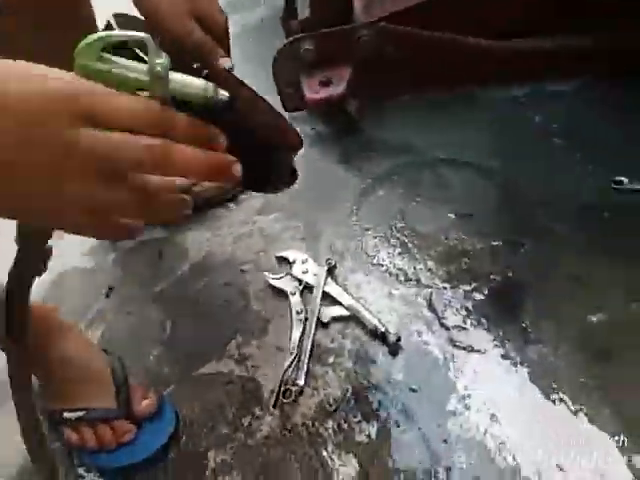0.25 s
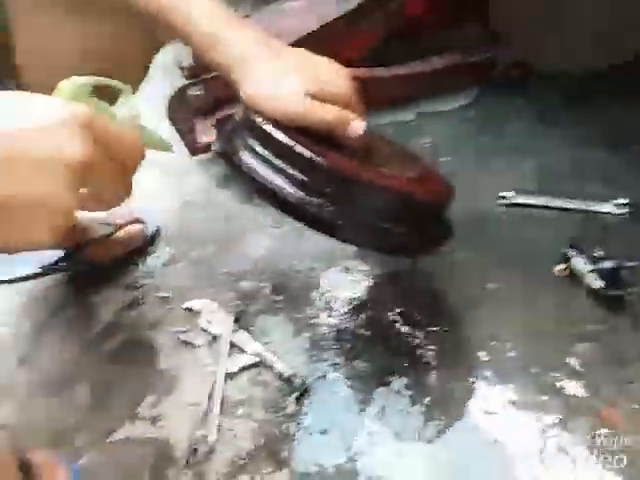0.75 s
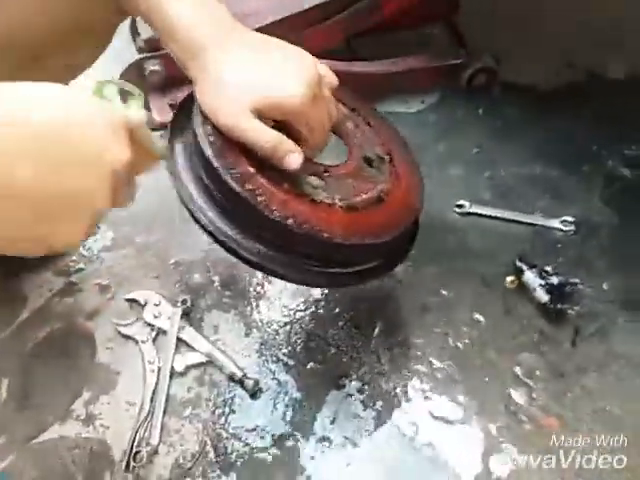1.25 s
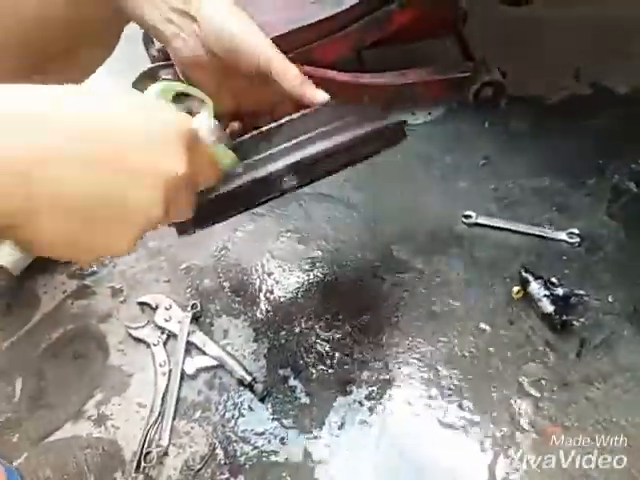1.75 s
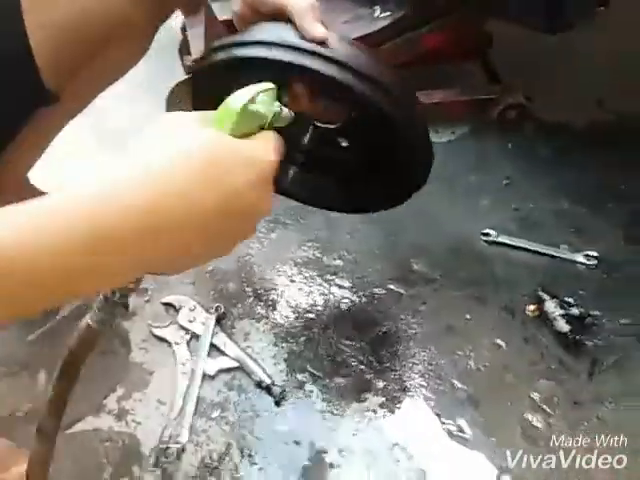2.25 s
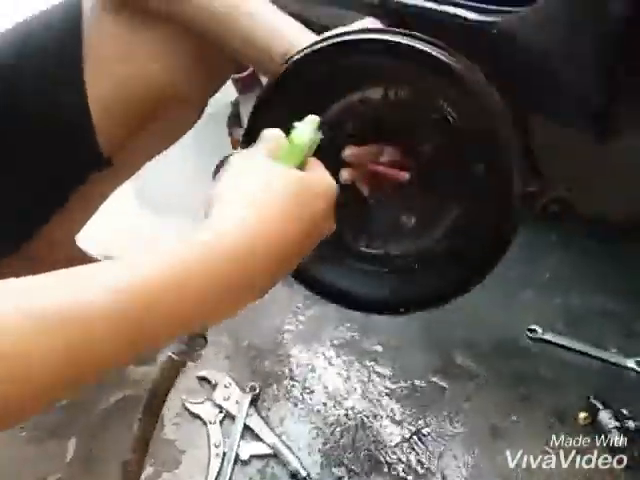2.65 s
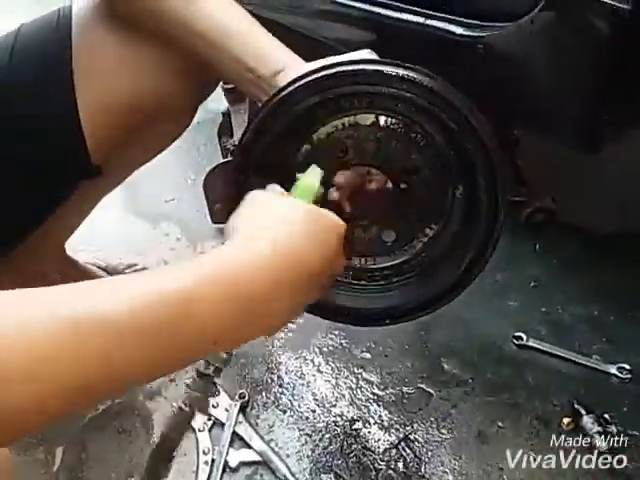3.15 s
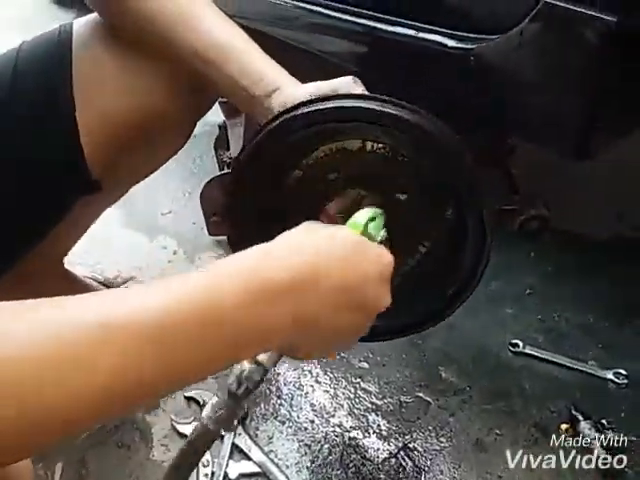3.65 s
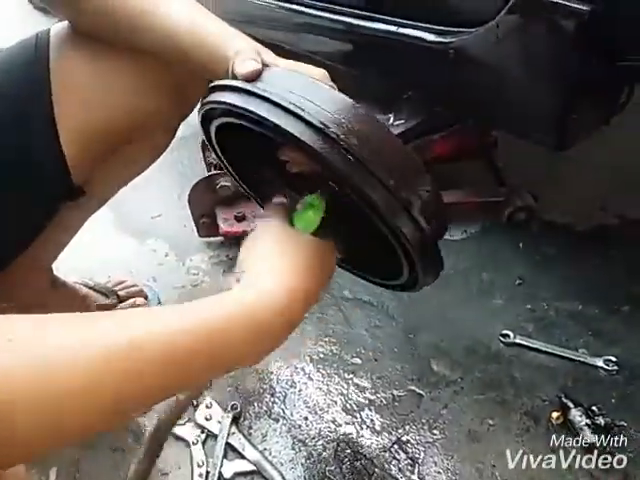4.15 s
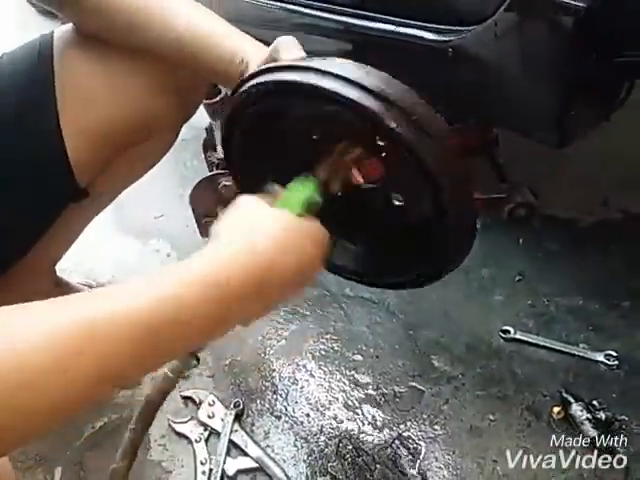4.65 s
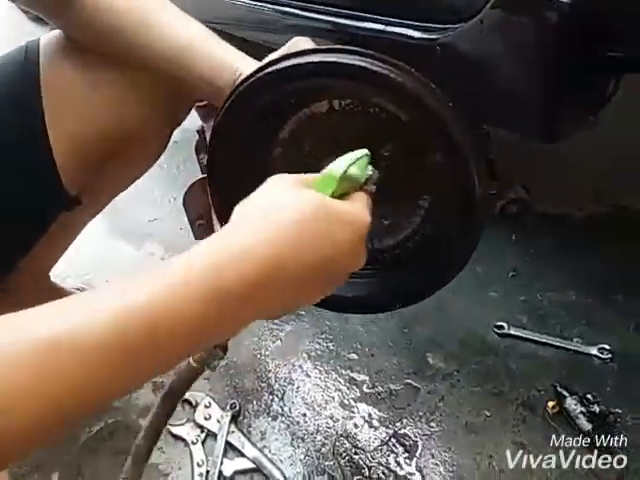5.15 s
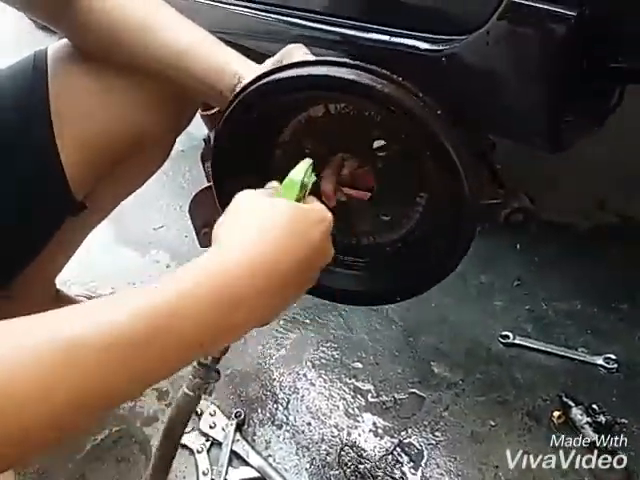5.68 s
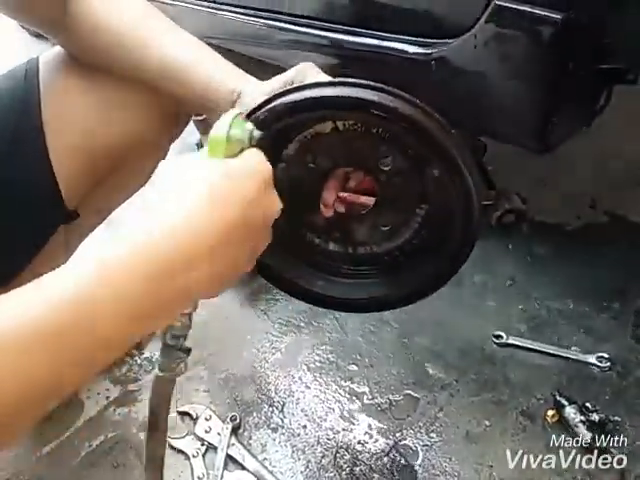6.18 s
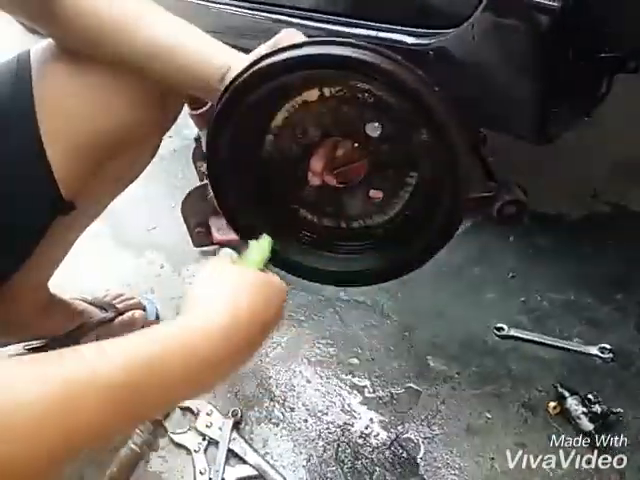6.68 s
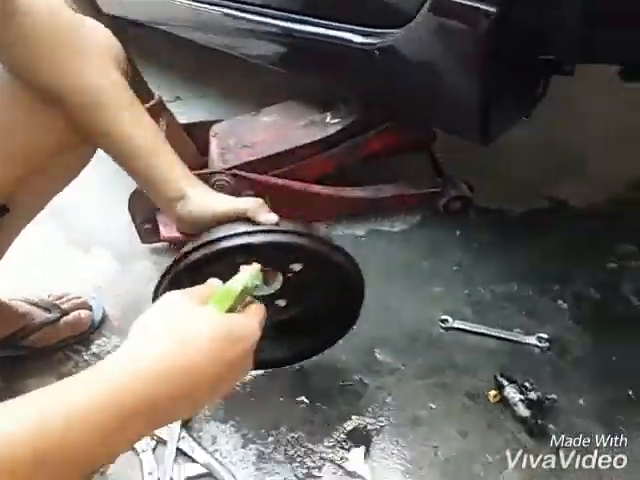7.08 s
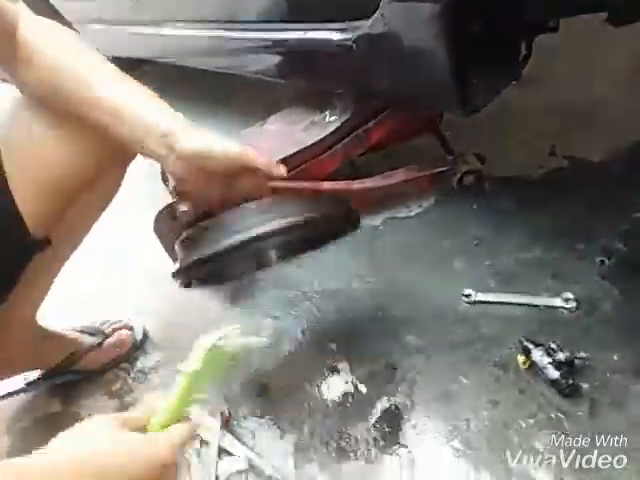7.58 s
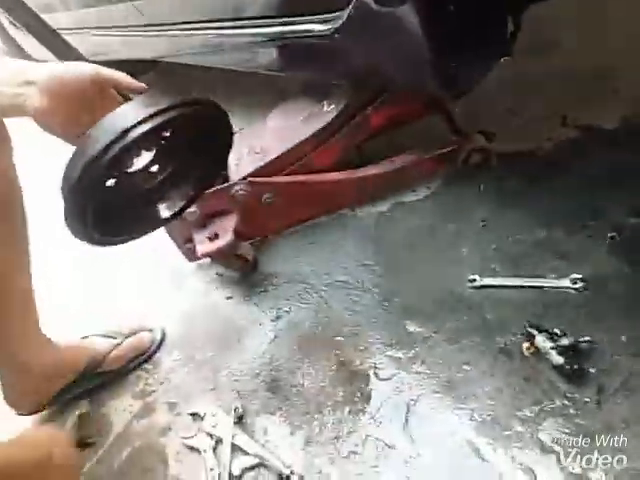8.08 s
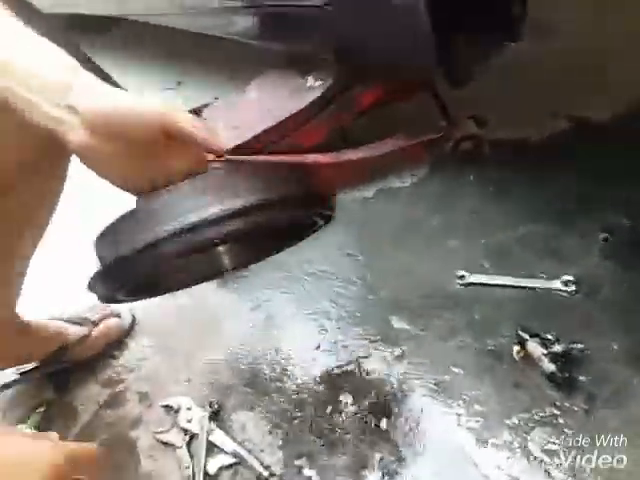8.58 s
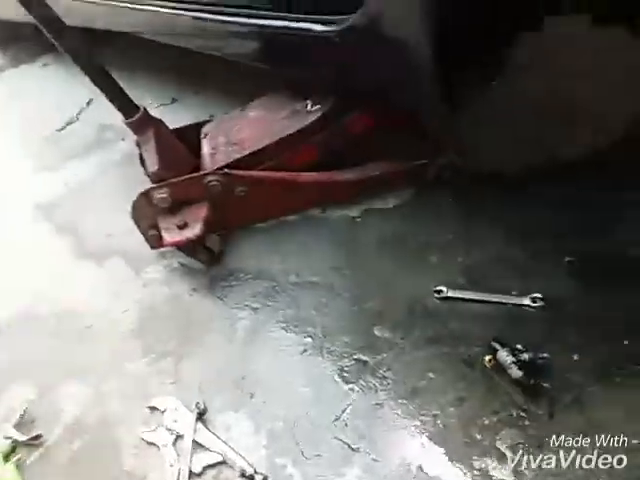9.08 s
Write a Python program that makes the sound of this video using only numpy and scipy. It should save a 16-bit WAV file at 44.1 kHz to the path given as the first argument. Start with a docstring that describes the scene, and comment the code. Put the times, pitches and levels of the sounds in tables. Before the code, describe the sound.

A workshop with a concrete floor, heard close and jumpy, as if time were skipping ahead. Over a faint low rumble, a brake drum is handled with soft gritty scrapes, ticks and small knocks. A bird outside cheeps faintly at about 1.4 and 2.5 seconds. Around 1.6 seconds a wrench clatters with a bright, chopped ring; a sharp tool clang follows near 3 seconds and a softer ring from the drum around 3.7. At about 4.9 seconds a compressed-air gun opens with a brief, very high whistle and a loud hiss that continues unbroken to the end, just past 9 seconds. The jet surges and changes colour in small steps as it sweeps the metal, sometimes bright and splashy, sometimes a hollow roar, especially between 7 and 8 seconds. Deflected air pops on the microphone near 7 seconds and again from about 8.5.

```python
"""A workshop with a wet concrete floor: a brake drum is handled among dropped tools, then blown dry
with a compressed-air gun, close enough for the air to buffet the microphone. Outside, a bird cheeps
over a low rumble. The scene runs in time lapse: time skips ahead every few hundredths of a second,
so levels jump in steps and rings are cut short. One microphone feeds both channels."""
import sys
import numpy as np
from scipy import signal
from scipy.fft import rfft, irfft, next_fast_len
from scipy.io import wavfile
from scipy.ndimage import uniform_filter1d

SR = 44100
rng = np.random.default_rng(int(sys.argv[2]) if len(sys.argv) > 2 else 0)


def put_to_file(sound):
    """Save the sound as 16-bit audio at rate SR, in the file named by the first command-line argument."""
    columns = np.atleast_2d(sound).T  # one column per channel
    safe = np.clip(columns, -1, 1)
    whole_steps = np.round(safe * 32767)
    wavfile.write(sys.argv[1], SR, whole_steps.astype(np.int16))


N = 411453
NOW = np.arange(N) / SR
SLICE_S, JOIN_S = 0.044, 0.0053   # a slice of the time lapse; the crossfade at a jump
VALVE_S = 4.856                   # the air gun opens


def amp(db):
    """dB to gain."""
    return 10 ** (np.asarray(db) / 20)


def rms_one(x):
    """Scale to rms 1."""
    return x / np.sqrt(np.mean(x ** 2) + 1e-20)


def add(out, s, sound):
    """Mix a sound in at a time."""
    at = round(s * SR)
    out[at:at + len(sound)] += sound[:N - at]


def along(rows):
    """The columns of a curve, joined by straight lines in time."""
    s, *columns = np.transpose(rows)
    return np.array([np.interp(NOW, s, c) for c in columns])


def held(background, events):
    """Each event holds its own values in place of the background; also the times of the jumps."""
    out = background.copy()
    for s, length, *values in events:
        out[:, round(s * SR):round((s + length) * SR)] = np.array(values)[:, None]
    s, length = np.transpose(events)[:2]
    jumps = np.unique(np.round(np.r_[s, s + length], 3))
    distinct = np.diff(jumps, append=99) > 0.006
    return out, jumps[distinct & (jumps < N / SR)]


def joined(db):
    """Gains with their jumps softened by short crossfades."""
    return uniform_filter1d(amp(db), size=round(JOIN_S * SR), axis=-1)


def per_slice(low, high):
    """A new random value for every slice of the time lapse."""
    return rng.uniform(low, high, 400)[(NOW / SLICE_S).astype(int)]


def grainy(spread_db):
    """White noise whose samples differ widely in size: grit, droplets, eddies."""
    return rng.standard_normal(N) * amp(spread_db * np.minimum(rng.exponential(1, N), 5))


def lumps(rate_hz, depth_db):
    """Random gain that wanders at about the given rate."""
    hop = 16
    lowpass = signal.butter(2, rate_hz, fs=SR / hop, output="sos")
    slow = rms_one(signal.sosfilt(lowpass, rng.standard_normal(N // hop + 2)))
    return amp(depth_db * np.interp(np.arange(N) / hop, np.arange(len(slow)), slow))


def coloured(x, spectrum):
    """Filter a signal by the spectrum; rms 1."""
    size = next_fast_len(N)
    bins_hz = np.maximum(np.fft.rfftfreq(size, 1 / SR), 1)
    hz, db = np.transpose(spectrum)
    gain = amp(np.interp(np.log(bins_hz), np.log(hz), db))
    return rms_one(irfft(rfft(x, size) * gain, size)[:N])


def resonance(x, hz, width):
    """Two-pole peak of gain 1."""
    r = np.exp(-np.pi * width / SR)
    poles = [1, -2 * r * np.cos(2 * np.pi * hz / SR), r * r]
    return signal.lfilter(np.array([1, 0, -1]) * (1 - r * r) / 2, poles, x)


def steep_resonance(x, hz, width):
    """The same peak twice over."""
    return resonance(resonance(x, hz, width), hz, width)


def focused(x, starts, focus_hz, breadth):
    """A broad peak that jumps to a new pitch at every start; each stretch at rms 1."""
    out, edges = np.zeros(N), list(np.round(starts * SR).astype(int)) + [N]
    for a, b, hz in zip(edges, edges[1:], focus_hz):
        lead = min(a, 200)   # samples for the filter to settle
        out[a:b] = rms_one(resonance(x[a - lead:b], hz, breadth * hz)[lead:])
    return out


# Low background rumble at the microphone; it ducks after the loud clang, then recovers:
# (time [s], level [dB])
RUMBLE_LEVEL = [(0.0, -53), (1.3, -55.5), (2.96, -56), (3.06, -73), (3.3, -61), (3.43, -56.5), (4.8, -55.5),
                (6.5, -58), (8.2, -56), (8.5, -53), (9.33, -49)]
# Its colour: (frequency [Hz], level [dB])
RUMBLE_SPECTRUM = [(20, -14.5), (45, -2), (75, -2), (130, -3.5), (200, -11.5), (400, -53)]
def rumble():
    """Dull noise from far off, following a level curve."""
    return amp(along(RUMBLE_LEVEL)[0]) * coloured(rng.standard_normal(N), RUMBLE_SPECTRUM)


# Bird out in the yard: (time [s], length [s], first pitch [Hz], goal pitch [Hz], rise [s], level [dB])
BIRD_CHEEPS = [(1.406, 0.084, 1513, 1843, 0.02, -48.5), (2.454, 0.094, 1400, 1955, 0.038, -53.5),
               (4.794, 0.11, 1470, 1800, .03, -61)]
# Its throat favours the third harmonic: (multiple of the pitch, level [dB])
BIRD_HARMONICS = [(2, -8), (3, 0), (4, -14), (5, -12), (6, -22), (7, -17)]
def bird(echo_decay_s=0.03, echo_db=3):
    """Rising, husky cheeps: overtones of a wavering pitch that levels off, smeared by yard echoes."""
    out = np.zeros(N)
    for s, length, first_hz, goal_hz, rise, db in BIRD_CHEEPS:
        progress = np.arange(round(length * SR)) / (length * SR)
        waver, flutter = rms_one(uniform_filter1d(rng.standard_normal((2, len(progress))), size=30))
        pitch = goal_hz - (goal_hz - first_hz) * np.exp(-progress * length / rise)
        phase = np.cumsum(pitch * (1 + 0.03 * waver)) * 2 * np.pi / SR
        tone = sum(amp(level_db) * np.sin(k * phase) for k, level_db in BIRD_HARMONICS)
        add(out, s, amp(db + 2 * flutter) * tone * np.sin(np.pi * progress ** 0.48))
    t = NOW[:round(0.15 * SR)]
    echoes = rng.standard_normal(len(t)) * np.exp(-t / echo_decay_s)
    return out + amp(echo_db) * signal.fftconvolve(out, echoes / np.linalg.norm(echoes))[:N]


# Faint shuffle on the floor nearby: (time [s], level [dB], brightness [dB])
FLOOR_SHUFFLE = [(0, -58, -5), (.3, -60.5, -9), (.6, -65, -6), (1.0, -57, -10), (1.5, -61.5, -7.5),
                 (1.95, -62.5, 0), (2.3, -55.5, -6), (2.7, -66, -11.5), (2.93, -58.5, -12.5),
                 (3.02, -63.5, 10), (3.17, -72, 9), (3.25, -55, -1), (3.55, -65, -8), (3.95, -54, -4.5),
                 (4.2, -64.5, -7.5), (4.5, -58.5, -2.5), (4.85, -54.5, 1.5)]
# Drags across it: (time [s], length [s], level [dB], brightness [dB], fade [dB])
FLOOR_DRAGS = [(.005, 0.081, -50.5, -10, -2), (.128, 0.062, -45, -20, 12), (0.219, .086, -56, -6.5, -6),
               (.36, 0.075, -42.5, -15, 14.5), (0.508, 0.092, -53, -8.5, 4), (0.67, 0.039, -47, -11.5, 1),
               (0.759, 0.035, -47, -8, -6), (0.792, 0.089, -50, -8, 7), (0.878, 0.047, -41.5, -3.5, 6.5),
               (0.972, 0.071, -47, -17.5, 13), (1.057, .133, -46.5, -15.5, 0.5),
               (1.19, 0.048, -47, -14, -3.5), (1.457, 0.1, -55.5, -12, -2), (1.541, 0.038, -37.5, -11, 4),
               (1.586, 0.103, -33.5, -4, 5.5), (1.677, 0.081, -51.5, -8, -2.5), (1.76, 0.099, -51, -8, 3),
               (1.902, 0.053, -53.5, -8.5, 3), (2.028, 0.064, -48, -10, 4),
               (2.073, 0.046, -45.5, -3.5, -0.5), (2.121, 0.039, -62, -1, 3), (2.165, 0.13, -52, -12, 3.5),
               (2.492, 0.059, -54.5, -8, -2), (2.619, .034, -56, -16, -1.5), (2.739, 0.12, -53.5, -15, 12),
               (2.831, 0.078, -44, -14, 6), (2.941, 0.0096, -37, 6, -3.5), (2.953, 0.052, -26.5, 5, 18),
               (3.128, 0.048, -69, -2, 8), (3.181, 0.089, -64, 7, -9), (3.265, 0.038, -53, -6, -6),
               (3.391, 0.07, -47.5, -4, 2), (3.444, 0.051, -38, -3.5, 8.5), (3.604, 0.052, -52.5, -15, 2.5),
               (3.71, 0.069, -48, -8, -0.5), (3.844, .044, -51.5, -17, -1), (4.113, .087, -47.5, -10, 14),
               (4.244, 0.036, -49, -17.5, 3), (4.431, .07, -55.5, -6, 3), (4.59, 0.05, -53, 5.5, -4),
               (4.724, 0.047, -50.5, -9, 2)]
# Three colours of the concrete: (frequency [Hz], level [dB])
THUMP_COLOUR = [(60, -16), (150, -7), (320, -1), (700, -7.5), (1400, -15.5), (4000, -50)]
SCRAPE_COLOUR = [(200, -16), (600, 4.5), (1200, 0), (2200, -1), (3500, -2.5), (6000, -3.5), (9000, -17)]
GRIT_COLOUR = [(1200, -23), (3000, -8.5), (5000, -4), (7000, -6), (9000, -17.5), (12000, -17.5),
               (15500, -12)]
def handling(shuffle_hz=1500, scrape_hz=2380, hz_per_db=74):
    """Drum, hose and sandals drag over the concrete: bright drags are gritty and high, dull ones thump."""
    level_db, bright_db = along(FLOOR_SHUFFLE)
    shuffle = np.array([level_db + per_slice(-1, 1), bright_db, np.full(N, shuffle_hz)])
    drags = [(s, length, db, bright, scrape_hz + hz_per_db * bright)
             for s, length, db, bright, _ in FLOOR_DRAGS]
    (level_db, bright_db, hz), jumps = held(shuffle, drags)
    thump_db = -52.5 + 0.47 * (level_db + 55) - 0.49 * (bright_db + 10)
    fade_db = sum(fade * (NOW - s) / length * (NOW >= s) * (NOW < s + length)
                  for s, length, _, _, fade in FLOOR_DRAGS)
    fade_db += 200 * (NOW > VALVE_S)   # silent once the air is on
    thump, scrape, grit = joined(np.array([thump_db, level_db, level_db + bright_db]) - fade_db)
    starts = np.r_[0, jumps]
    focus_hz = hz[(starts * SR).astype(int) + 100]   # just after each jump
    scraping = focused(coloured(grainy(2.7), SCRAPE_COLOUR), starts, focus_hz, breadth=1.38)
    rubbing = scrape * scraping + grit * coloured(grainy(2.5), GRIT_COLOUR)
    return thump * coloured(grainy(4.0), THUMP_COLOUR) + rubbing * lumps(17.5, 2.84)


# Dry ticks at floor level: (time [s], level [dB])
GRIT_TICKS = [(1.228, -35.5), (2.247, -41), (2.827, -40), (3.391, -30), (3.631, -42.5), (3.647, -48),
              (4.111, -35.5), (4.669, -33.5)]
def grit_ticks(hz=3160, decay_s=0.0024):
    """Grit cracks under the drum: a blink of noise in one broad peak."""
    out, t = np.zeros(N), NOW[:round(0.02 * SR)]
    for s, db in GRIT_TICKS:
        noise = rms_one(resonance(rng.standard_normal(len(t)), hz, 0.5 * hz))
        add(out, s, amp(db) * noise * np.exp(-t / decay_s))
    return out


# Small knocks nearby: (time [s], level [dB], pitch [Hz])
SMALL_KNOCKS = [(.014, -30, 1960), (.131, -38.5, 2150), (.362, -36.5, 2520), (0.522, -40.5, 440),
                (.772, -30.5, 330), (1.074, -35.5, 710), (1.193, -29.5, 900), (1.201, -30.5, 328),
                (1.563, -30, 4400), (2.21, -41, 1030), (2.289, -44, 1540), (2.509, -35.5, 1540),
                (2.843, -29, 2240), (2.847, -34.5, 4000), (2.947, -21, 3400), (2.947, -30, 1550),
                (2.951, -26, 5500), (2.962, -24, 6430), (3.268, -31, 555), (3.301, -29.5, 625),
                (3.447, -34, 2060), (3.631, -36.5, 402), (3.728, -35, 4660), (3.728, -35, 1840),
                (4.246, -41, 410), (4.825, -50, 1680)]
# Longer-ringing knocks, one low thud and several metal clinks: (time [s], level [dB], pitch [Hz])
LONG_KNOCKS = [(1.548, -31.5, 144), (1.552, -28, 2950), (1.556, -35, 5800), (1.722, -37, 2830),
               (1.9, -46, 2480), (2.62, -41, 1530), (2.738, -44, 1516), (2.785, -47, 2700),
               (3.272, -39, 4600), (4.515, -48, 3000), (4.6, -43, 4800)]
def knocks(rows, t60_at_1khz_s):
    """A short crack and a damped, slightly rough ring; lows swell and die more slowly."""
    out, t = np.zeros(N), NOW[:round(0.15 * SR)]
    for s, db, hz in rows:
        noise = rng.standard_normal((2, len(t)))
        t60 = t60_at_1khz_s * (1000 / hz) ** 0.22
        ring = np.sin(2 * np.pi * hz * t) + 0.5 * rms_one(resonance(noise[0], hz, 0.4 * hz))
        envelope = np.clip(t / (0.001 + 0.64 / hz), 0, 1) * amp(-60 * t / t60)
        crack = 0.23 * noise[1] * np.exp(-t / 0.0004) * np.clip(t / 0.00043, 0, 1)
        add(out, s, amp(db) * (ring * envelope + crack))
    return out


# Modes of the metal on the floor, close by: (frequency [Hz], level [dB], t60 [s])
WRENCH_MODES = [(349, -14, 0.23), (1260, -8, 0.21), (1460, -21, 0.61), (1900, -18, 1), (2090, -7, 0.24),
                (2654, 0, 0.2), (2800, -39, .4), (4200, -7.5, 0.39), (4230, -2.5, 0.45),
                (5240, -13.5, 0.82), (5390, -5, 0.59), (6420, -8, 0.45), (6616, -13, 0.27), (7600, -33, .3),
                (8020, -23, 0.28), (8060, -21, 0.47), (9098, -22.5, 0.55), (9292, -25, 0.57),
                (10320, -23.5, 0.53), (11050, -27, .25), (11550, -32, .25), (12000, -27, 0.39),
                (13750, -32, .25), (15200, -32, .3), (12600, -36, .3), (13190, -27, 0.52), (14220, -28, .4)]
PLIERS_MODES = [(2470, 1, 0.3), (2500, -15, .1), (5500, -32, 0.11)]
DRUM_MODES = [(840, 3.5, 0.67), (840, -17, .3), (2290, -5.5, 0.38), (4040, -9, 0.16), (6002, -14, .15),
              (8075, -20, .13)]
# Slices of ringing, each until the next: (time [s], level [dB], ring age [s], hardness [dB/octave])
WRENCH_SLICES = [(1.591, -24, 0.0037, 1.5), (1.632, -12.5, 0.02, 0.5), (1.654, -12, 0.03, 2),
                 (1.678, -16.5, 0.071, 0), (1.722, -19.5, 0.077, 0.5), (1.765, -19, 0.22, 5),
                 (1.812, -25, 0.25, 4.5), (1.9, -26, 0.39, 11)]
PLIERS_SLICES = [(2.955, -13.5, 0.0058, 0), (2.978, -19, 0.0072, 0), (3.005, -36, 0.033, 0),
                 (3.042, -46, .05, 0)]
DRUM_SLICES = [(3.667, -64, 0.018, 2), (3.708, -39.5, 0.0032, 5), (3.752, -36, 0, 1), (3.8, -37, 0.068, -1),
               (3.86, -41, .15, 0)]
def struck_metal(modes, slices, end_s):
    """Each slice catches the ringing at some age: the short-lived modes are gone from the older ones."""
    out = np.zeros(N)
    hz, level_db, t60 = np.transpose(modes)[:, :, None]
    ends = [row[0] for row in slices[1:]] + [end_s]
    for (s, db, age, hardness), end in zip(slices, ends):
        t = NOW[:round((end - s + JOIN_S) * SR)]
        colour_db = level_db + hardness * np.log2(hz / 2500) + rng.normal(0, 1, hz.shape)
        strength = amp(db + colour_db - 60 * (t + age) / t60)
        rings = np.sum(strength * np.sin(2 * np.pi * (hz * t + rng.random(hz.shape))), axis=0)
        crossfade = np.clip(t / JOIN_S, 0, 1) * np.clip((end - s - t) / JOIN_S + 1, 0, 1)
        add(out, s, rings * crossfade)
    return out


# Faint whistle at the gun: (time [s], pitch [Hz], level [dB])
VALVE_WHISTLE = [(4.85, 11650, -83), (4.862, 11700, -26.5), (4.9, 11700, -38), (4.94, 11450, -43),
                 (4.955, 11740, -31), (5.0, 11400, -39), (5.06, 11150, -40), (5.12, 11100, -67)]
def valve_whistle():
    """The opening valve sings a rough tone on a sinking pitch."""
    s, hz, db = np.transpose(VALVE_WHISTLE)
    phase = np.cumsum(np.interp(NOW, s, hz)) * 2 * np.pi / SR
    level = amp(np.interp(NOW, s, db, left=-150, right=-150))
    return level * np.sqrt(2) * np.sin(phase) * lumps(230, 5.0)


# Puffs right on the microphone: (time [s], length [s], level [dB], pitch [Hz])
MIC_PUFFS = [(6.93, 0.061, -25, 174), (6.937, 0.088, -30.5, 80), (7.653, 0.04, -38.5, 130),
             (8.46, 0.062, -38.5, 138), (8.58, 0.065, -39, 110), (8.62, 0.02, -30, 129),
             (8.92, 0.075, -38, 107), (9.096, 0.038, -61, 99), (9.18, 0.048, -36, 120)]
def puffs():
    """Short low pops where deflected air crosses the microphone."""
    out = np.zeros(N)
    for s, length, db, hz in MIC_PUFFS:
        noise = steep_resonance(rng.standard_normal(SR // 4), hz, 0.71 * hz)[-round(length * SR):]
        add(out, s, amp(db) * rms_one(noise) * np.hanning(len(noise)))
    return out


# The air inside the drum, and its iron: (frequency [Hz], nominal width [Hz], level [dB])
CAVITY_MODES = [(742, 137, -0.5), (1192, 198, 5.5), (1553, 93, -2.5), (2023, 67, 0.5), (2610, 250, -11),
                (3244, 77, 3), (3850, 79, 2), (4340, 180, -8)]
IRON_MODES = [(2364, 25, 0), (2992, 58, -0.5), (3570, 57, -2.5), (4385, 32, -3), (4700, 87, -2.5),
              (5030, 63, -1), (5460, 66, -2), (5980, 56, -3.5), (6460, 82, 0), (6910, 71, -2)]
def blown_modes(eddies, modes, depth_db):
    """The jet's eddies drive sharp modes, each fed more or less as the nozzle wanders."""
    return sum(amp(db) * (-1) ** k * steep_resonance(eddies, hz, 1.07 * width) * lumps(8.2, depth_db)
               for k, (hz, width, db) in enumerate(modes))


# The jet sweeps the drum, close up: (time [s], hollow [dB], rim [dB], splash [dB], nozzle [dB])
JET_SWEEP = [(4.856, -35.5, -29.5, -26, -27), (5.3, -33, -29, -28.5, -26.5), (5.38, -39, -36, -31, -25),
             (5.5, -44, -29, -23.5, -28), (5.62, -42, -39, -23, -30), (5.8, -45, -36.5, -26, -25.5),
             (5.98, -40.5, -30.5, -22, -28), (6.1, -44.5, -36, -29.5, -27.5),
             (6.36, -45.5, -36, -23.5, -29), (6.6, -39, -38, -29.5, -29), (6.88, -32.5, -32.5, -25, -25.5),
             (7.0, -43, -31, -24.5, -33), (7.1, -28, -33.5, -27, -24.5), (7.19, -41.5, -38, -31, -28.5),
             (7.36, -32, -35, -26, -27), (7.72, -38.5, -37, -28, -29.5), (8.1, -41.5, -36, -30, -28.5),
             (8.3, -36.5, -31.5, -27, -25.5), (8.7, -44.5, -34.5, -23, -27),
             (8.95, -39.5, -31.5, -28, -25.5), (9.12, -45, -31, -21, -29), (9.33, -30, -33, -26, -30)]
# It catches an edge or dips inside:
# (time [s], length [s], wind on the microphone [dB], hollow [dB], rim [dB], splash [dB])
JET_SURGES = [(5.002, 0.15, -45.5, -36, -25.5, -23.5), (5.127, 0.13, -42, -37.5, -23.5, -20),
              (5.393, .047, -46, -37, -24, -23), (5.436, 0.042, -39, -38.5, -26, -19),
              (5.525, 0.02, -39, -40, -30, -19), (5.68, 0.017, -34, -33.5, -37, -20.5),
              (5.875, 0.046, -38, -37, -32, -20.5), (6.033, .025, -45, -41, -34, -21),
              (6.099, .04, -37, -36.5, -28.5, -17), (6.185, 0.029, -38, -34.5, -31.5, -22),
              (6.271, 0.041, -44.5, -40.5, -34, -22), (6.41, .04, -33.5, -32.5, -30.5, -19),
              (6.58, 0.044, -39.5, -30, -40, -29.5), (6.675, 0.15, -45, -28.5, -28.5, -26.5),
              (6.851, .03, -39, -39, -35, -23.5), (6.935, 0.047, -25, -49, -34.5, -27),
              (7.027, 0.044, -37, -27.5, -19.5, -24), (7.203, 0.08, -40.5, -31, -27, -27.5),
              (7.273, .062, -42, -31.5, -22, -22), (7.392, .129, -42.5, -30.5, -30.5, -23.5),
              (7.522, 0.073, -44, -25, -22, -22.5), (7.6, .093, -43, -28, -28, -25),
              (7.82, 0.037, -50, -26.5, -21.5, -26.5), (7.879, 0.06, -40, -27, -20, -25.5),
              (7.93, .02, -48, -38, -25, -29), (8.004, 0.035, -48, -34, -35.5, -27.5),
              (8.436, 0.095, -44.5, -36.5, -29, -25), (9.192, 0.032, -51, -34.5, -27, -20.5),
              (9.06, .135, -46, -40, -30.5, -21.5), (9.287, .07, -37.5, -28, -20.5, -17)]
# Its colours at the microphone: (frequency [Hz], level [dB])
WIND_COLOUR = [(25, -13), (80, -7.5), (170, -1.5), (350, -0.5), (600, -6.5), (1500, -28)]
HOLLOW_COLOUR = [(250, -36), (480, -8), (620, 0), (800, -5.5), (1300, -7), (2000, -22.5), (4000, -34)]
RIM_COLOUR = [(500, -33), (1000, 2.5), (1700, 6.5), (2600, 3.5), (3600, 3.5), (6000, 0), (9000, -35)]
SPLASH_COLOUR = [(1000, 0), (2500, -3), (4200, 0.5), (5500, -2.5), (6800, 0.5), (8000, -3.5), (9500, -9.5),
                 (12000, -5)]
NOZZLE_COLOUR = [(3000, -20), (7000, 1), (9500, -4), (11000, -2), (13000, 0.5), (15300, 5.5), (17000, 1.5)]
def air_gun(opening_s=0.0074):
    """The free jet hisses; on the drum it splashes, roars on the rim and sets the hollow sounding."""
    *drum_db, nozzle_db = along(JET_SWEEP)
    wind_db = -45 - 0.84 * (NOW - VALVE_S)
    levels_db, jumps = held(np.array([wind_db, *drum_db]), JET_SURGES)
    wind, hollow, rim, splash = joined(levels_db)
    _, hollow_db, rim_db, splash_db = levels_db
    starts = np.r_[VALVE_S, jumps]
    middles = ((starts + np.r_[jumps, N / SR]) / 2 * SR).astype(int)
    inward_db = hollow_db - splash_db   # lowers the roar and lifts the cavity modes
    roar_hz = np.clip(1910 - 55 * inward_db[middles], 1200, 4000)
    splash_hz = np.clip(4390 - 99 * (rim_db - splash_db)[middles], 3000, 7000)

    eddies = grainy(2.1) * lumps(20, 0.95)
    cavity = blown_modes(eddies, CAVITY_MODES, depth_db=3.2) * joined(0.21 * (inward_db + 6.5))
    iron = blown_modes(eddies, IRON_MODES, depth_db=4.0) * amp(-1)
    boom = eddies + cavity + iron
    roar = focused(coloured(boom, RIM_COLOUR), starts, roar_hz, breadth=0.61)

    droplets = grainy(1.65) * lumps(20, 0.96)
    spray = coloured(droplets + 0.95 * cavity + iron, SPLASH_COLOUR)
    # An echo off a near surface combs the spray; hands and drum move, so each slice has a new delay.
    lag = (per_slice(0.0004, 0.003) * SR).astype(int)
    echo = spray[np.maximum(np.arange(N) - lag, 0)]
    spray = focused(spray + 0.59 * echo, starts, splash_hz, breadth=0.83)

    on_drum = hollow * coloured(boom, HOLLOW_COLOUR) + rim * roar + splash * spray
    gusts = wind * rms_one(coloured(rng.standard_normal(N), WIND_COLOUR) * lumps(70, 1.9))
    hiss = amp(nozzle_db) * coloured(grainy(2.6), NOZZLE_COLOUR)
    return np.clip((NOW - VALVE_S) / opening_s, 0, 1) * (on_drum + gusts + hiss)


def scene():
    """Everything reaches one microphone."""
    mic = rumble() + handling()
    mic += struck_metal(WRENCH_MODES, WRENCH_SLICES, end_s=2.035)
    mic += struck_metal(PLIERS_MODES, PLIERS_SLICES, end_s=3.088)
    mic += struck_metal(DRUM_MODES, DRUM_SLICES, end_s=3.95)
    mic += knocks(SMALL_KNOCKS, t60_at_1khz_s=0.047) + knocks(LONG_KNOCKS, t60_at_1khz_s=0.14)
    mic += grit_ticks() + bird()
    mic += air_gun() + puffs() + valve_whistle()
    return np.tile(mic, (2, 1))


def record(dry):
    """The treble is cut steeply above 15.5 kHz."""
    return signal.sosfilt(signal.ellip(16, 0.5, 85, 15500, fs=SR, output="sos"), dry)


dry = scene()
out = record(dry)
put_to_file(out)
```